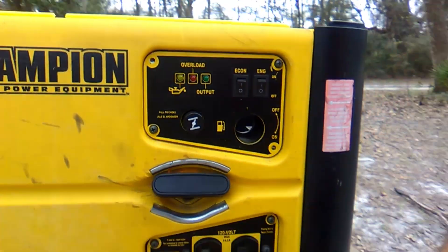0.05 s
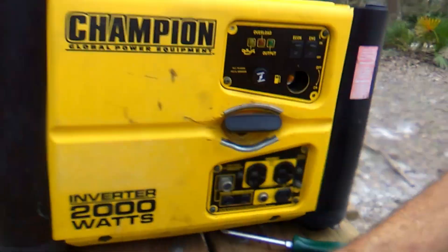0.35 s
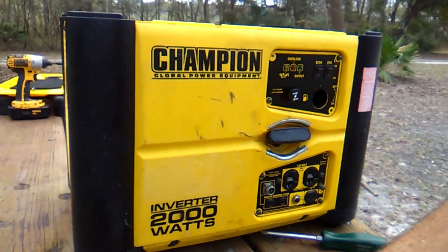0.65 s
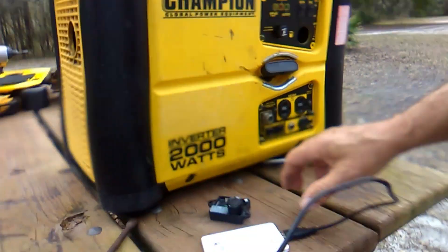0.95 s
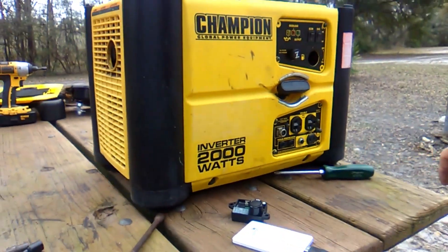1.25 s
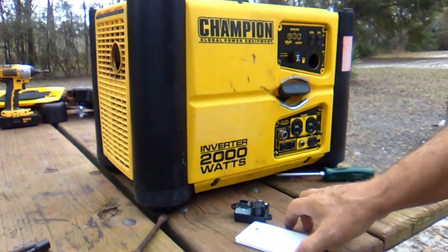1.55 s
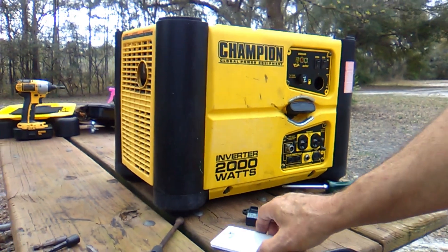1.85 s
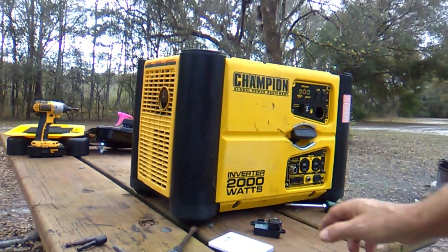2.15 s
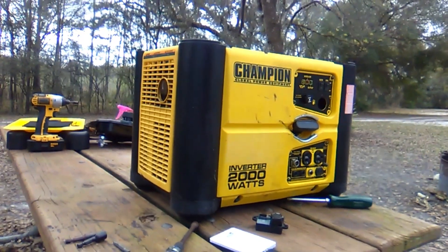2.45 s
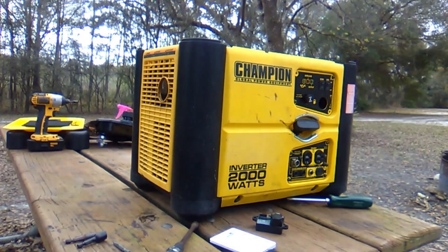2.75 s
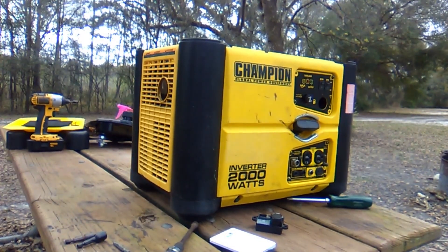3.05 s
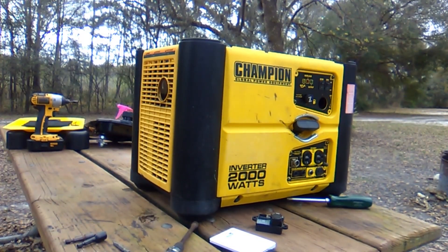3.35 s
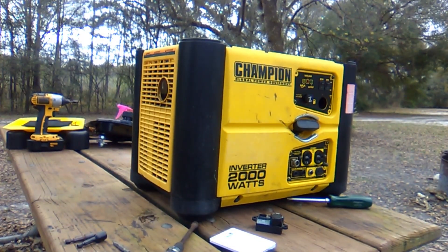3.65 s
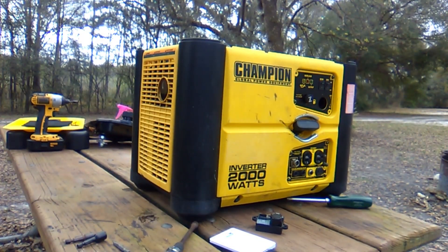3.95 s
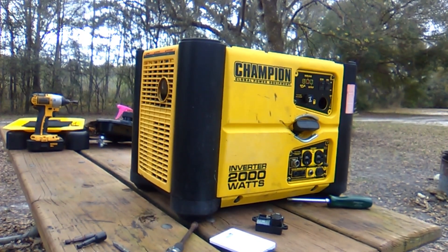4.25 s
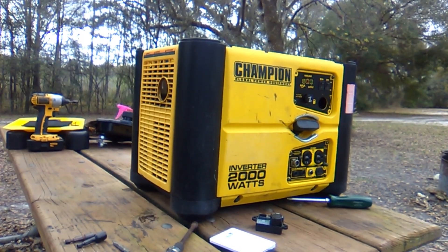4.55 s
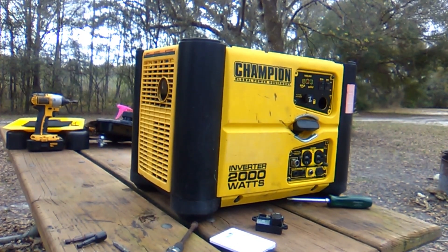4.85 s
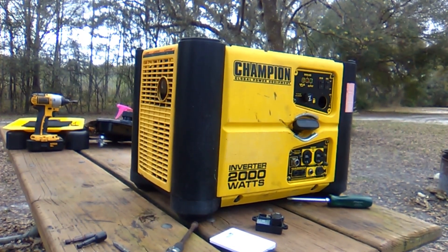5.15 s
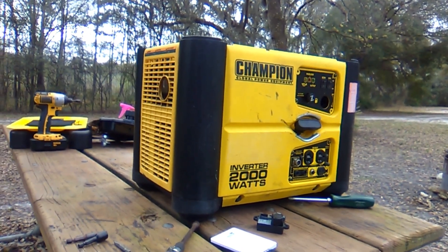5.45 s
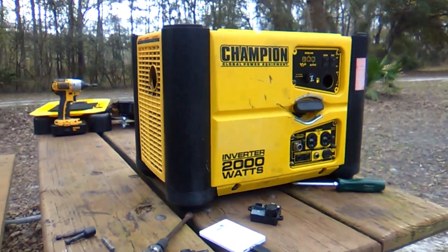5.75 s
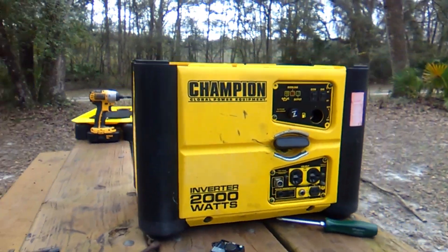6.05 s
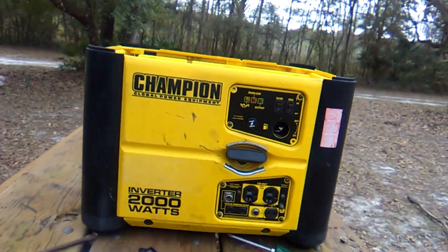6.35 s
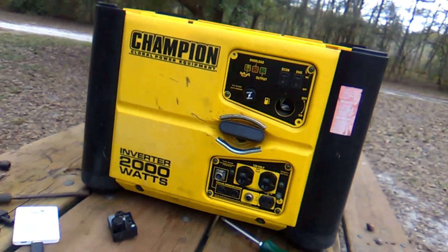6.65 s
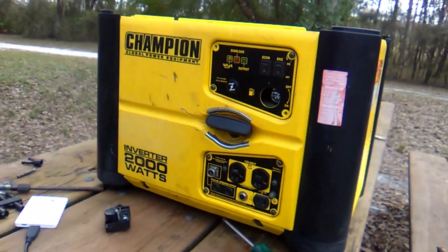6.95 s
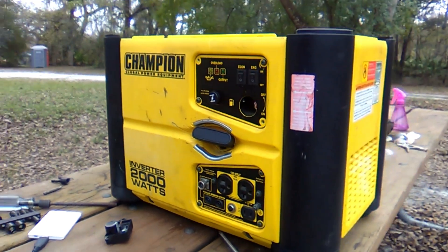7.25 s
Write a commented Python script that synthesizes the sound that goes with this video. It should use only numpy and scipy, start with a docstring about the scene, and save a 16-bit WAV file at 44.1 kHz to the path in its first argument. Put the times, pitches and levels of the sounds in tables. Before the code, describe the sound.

Fingers knock and rub on a hand-held camera, very close and mostly on the left. Dense hollow thumps, sharp plastic clicks and scrapes fill the first second or so, and a shorter burst follows. After a calmer stretch with light hissy brushes of skin, a few softer bumps return near the end. Behind it all, a small generator idles quietly outdoors with a steady low hum, fine ticking and a hiss of fan air.

```python
"""Fingers knock, judder and rub on a hand-held camera's case, next to the left microphone.
Each knock rings the case, and the hardest drive a limiter. The seams click, the grip crackles,
jolts rumble, and skin brushes over the ports, which ring near 9 kHz.
Behind this a small inverter generator idles on a picnic table outdoors as the camera moves around it:
its firings hum and puff, its valves ping their cover and its fan blows cooling air."""
import sys
import numpy as np
from scipy import signal
from scipy.fft import rfft, irfft, next_fast_len
from scipy.io import wavfile
from scipy.ndimage import uniform_filter1d, minimum_filter1d, map_coordinates

SR = 44100
rng = np.random.default_rng(int(sys.argv[2]) if len(sys.argv) > 2 else 0)


def to_wav(s):
    """Save 16-bit WAV."""
    ch = np.atleast_2d(s).T  # columns
    pcm = np.round(np.clip(ch, -1, 1) * 32767)  # PCM
    wavfile.write(sys.argv[1], SR, pcm.astype(np.int16))


N = 327222


def amp(db):
    """Decibels to gain."""
    return np.exp(np.asarray(db) * np.log(10) / 20)


def unit(x):
    """x scaled to rms 1."""
    return x / np.sqrt(np.mean(x ** 2) + 1e-20)


def peaked(x):
    """x scaled to peak 1 per channel."""
    return x / np.abs(x).max(axis=-1, keepdims=True)


def curves(rows):
    """One value per sample for each column after the time."""
    times, *columns = np.transpose(rows)
    return [np.interp(np.arange(N) / SR, times, column) for column in columns]


def wobble(per_s, hop=32):
    """Smooth random curve, per_s knots a second."""
    grid = np.arange(0, N + hop, hop)
    knots = rng.standard_normal(int(N * per_s / SR) + 4)
    return np.interp(np.arange(N), grid, map_coordinates(knots, [grid * per_s / SR]))


def coloured(x, colour):
    """Minimum-phase filter. Each row of a colour: frequency in Hz, gain in dB."""
    n = x.shape[-1]
    size = 2 * next_fast_len(n // 2 + 4096)
    hz, db = np.transpose(colour)
    gain_db = np.interp(np.log(np.fft.rfftfreq(size, 1 / SR) + 1), np.log(hz), db)
    cepstrum = irfft(np.log(amp(gain_db)))
    cepstrum[1:size // 2] *= 2
    cepstrum[size // 2 + 1:] = 0
    return irfft(rfft(x, size) * np.exp(rfft(cepstrum)), size)[..., :n]


def stereo_noise(colour, shared):
    """Coloured noise of rms 1; a share of its power is common to both microphones."""
    common = np.sqrt(shared) * rng.standard_normal(N)
    separate = np.sqrt(1 - shared) * rng.standard_normal((2, N))
    return unit(coloured(common + separate, colour))


def patchy(x, depth_db=2.4):
    """Turbulence: the level drifts in patches of pitch and time."""
    spectra = signal.stft(x, nperseg=512)[2]
    patches = uniform_filter1d(rng.standard_normal(spectra.shape[1:]), size=4, axis=0)
    patches = uniform_filter1d(patches, size=28, axis=1)
    return unit(signal.istft(spectra * amp(depth_db * unit(patches)), nperseg=512)[1][:, :N])


def panned(pan_db):
    """Left and right gains of mean 1; pan is left minus right."""
    gains = amp(np.array([pan_db, -pan_db]) / 2).reshape(2, -1)
    return gains / gains.mean(axis=0)


def add(track, start_s, sound):
    """Mix a sound in at start_s."""
    start = max(round(start_s * SR), 0)
    track[..., start:start + sound.shape[-1]] += sound[..., :N - start]


def throb(cycles, lag, sharpness, depth):
    """Gain of rms 1 that swells once per engine cycle."""
    return unit(1 + depth * np.exp(sharpness * (np.cos(2 * np.pi * (cycles - lag)) - 1)))


def stroke(start_s, length_s, attack_s=0.025, t60_s=0.18):
    """Gain that rises, holds to the end of the stroke and dies away."""
    t = np.arange(N) / SR - start_s
    return np.clip(t / attack_s, 0, 1) * amp(-60 * np.clip((t - length_s) / t60_s, 0, 2))


def bell(x, centre, width):
    """Gaussian weight: 1 at the centre, 1/e one width away."""
    return np.exp(-np.minimum(((x - centre) / width) ** 2, 20))


# Each row: time in seconds, level in dB, pan in dB.
AIR_PATH = [(0.0, -41.5, -1.5), (0.47, -41, -1), (0.52, -47.5, -2), (0.58, -42, 7), (0.72, -45.5, -10),
            (1.15, -42, -1), (1.53, -49, -7), (1.86, -50, 0), (2.07, -49, -5), (2.4, -40, -3.5),
            (2.97, -56.5, -2), (3.62, -54, -5), (3.85, -61.5, -2), (4.25, -54, -6), (4.58, -57.5, -3),
            (4.72, -53, 0), (5.23, -51.5, 3), (5.81, -47.5, -15), (6.2, -48, 2), (6.45, -42.5, 1),
            (7.05, -46, 13), (7.42, -42, 3.5)]
# Each row: frequency in Hz, gain in dB.
AIR_COLOUR = [(2000, -8), (4500, -11.5), (6500, -9.5), (7400, -2.5), (8200, 6.5), (9200, 4), (10500, -2),
              (12000, -16.5), (14000, -21)]
FIZZ_COLOUR = [(5000, -32), (8000, -35), (10000, -4), (12500, 0), (14000, -7)]

def cooling_air(cycles):
    """Fan air hisses in eddies; its finest fizz dies first as the camera turns aside."""
    air_db, pan_db = curves(AIR_PATH)
    eddies = amp(1.1 * (wobble(5.035) + np.array([wobble(16), wobble(34)])))
    air = amp(air_db + 4.5) * patchy(stereo_noise(AIR_COLOUR, shared=0.0063))
    air *= throb(cycles, lag=0.18, sharpness=6.9, depth=0.99)
    fizz_db = air_db.mean() - 10 + 1.25 * (air_db - air_db.mean())
    fizz = amp(fizz_db) * stereo_noise(FIZZ_COLOUR, shared=0.03)
    return (air + fizz) * eddies * panned(pan_db)


# Each row: frequency in Hz, level in dB, t60 in seconds.
COVER_MODES = [(1767, -1, 0.087), (1994, -4, 0.093), (2478, 7, 0.041), (2574, 11, 0.043), (2700, 12, 0.024),
               (2976, 13, 0.037), (3120, 9.5, 0.019), (3335, 11, 0.027), (3500, 2, 0.025), (3780, 5, 0.022),
               (3905, 7, 0.024), (4090, 6, 0.015), (4493, 7.5, 0.058), (4795, 7.5, 0.037)]
# Directional cover rings. Each row: time in seconds, low ring in dB, high ring in dB.
RING_PATH = [(0, -1.5, 1), (2.5, -7.5, -7), (3.3, 3.5, -2), (4.0, -20, 8), (4.6, -6, 9), (5.2, 5.5, 5),
             (5.8, 9, 5), (6.55, -4, -1), (6.85, 5.5, 0), (7.42, 6.5, 5)]
# Closings and rebounds. Each row: share of the cycle, level in dB, favoured pitch in Hz.
VALVE_STRIKES = [(0.08, 0.5, 2470), (0.18, 2, 3176), (0.84, 0.5, 4020), (0.52, -6.5, 3800)]

def valve_ticks(cycles):
    """Each valve pings its own part of the cover; the modes swell and fade as the camera moves."""
    swell_db, swell_per_s, favour_db = 2.5, 2.383, 7.5
    scatter_db, detune_share, jitter_s = 2.2, 0.005, 0.00009
    track, t = np.zeros(N), np.arange(SR // 16) / SR
    hz, db, t60_s = np.transpose(COVER_MODES)
    decays = amp(db[:, None] - 60 * t / t60_s[:, None]) * (1 - np.exp(-t / 0.0013))
    path_s, low_db, high_db = np.transpose(RING_PATH)
    knots = rng.standard_normal((len(hz), 64))
    for share, valve_db, favoured_hz in VALVE_STRIKES:
        times = np.interp(np.arange(int(cycles[-1])) + share, cycles, np.arange(N) / SR)
        drift_db = swell_db * np.array([map_coordinates(row, [times * swell_per_s]) for row in knots]).T
        drift_db += np.outer(np.interp(times, path_s, low_db), bell(hz, 2560, width=200))
        drift_db += np.outer(np.interp(times, path_s, high_db), bell(hz, 3700, width=450))
        strike_db = valve_db + favour_db * bell(hz, favoured_hz, width=250)
        for start_s, mode_db in zip(times + rng.normal(0, jitter_s, len(times)), drift_db):
            detune, strength = rng.standard_normal((2, len(hz)))
            modes = decays * np.sin(2 * np.pi * np.outer(hz * (1 + detune_share * detune), t))
            gains = amp(strike_db + mode_db + scatter_db * (strength + rng.standard_normal()))
            add(track, start_s, gains @ modes)
    return unit(track)


# Each row: time in seconds, level in dB, pan in dB.
CLATTER_PATH = [(0.0, -48, 9), (0.31, -43, 6), (1.61, -45.5, 3.5), (2.31, -43, 2.5), (2.75, -44.5, 9),
                (2.93, -57, 8), (3.29, -58.5, 12), (4.55, -50.5, 1.5), (4.69, -51, -5.5), (5.35, -60.5, -2),
                (6.16, -42.5, -2.5), (6.2, -45, 0), (6.94, -40, 7), (7.42, -46.5, 17)]
# Each row: frequency in Hz, gain in dB.
WHIRR_COLOUR = [(400, -14), (1100, 11.5), (1500, 6), (2100, 1), (2600, 3.5), (3600, 6), (4600, 1.5),
                (5200, -1), (6200, 1.5), (8500, -2.5), (14000, 0)]

def valve_clatter(cycles):
    """Valve ticks over a whirr, loudest in front of the generator's panel."""
    db, pan_db = curves(CLATTER_PATH)
    ticks = np.array([valve_ticks(cycles), valve_ticks(cycles)])
    whirr = patchy(stereo_noise(WHIRR_COLOUR, shared=0.034))
    whirr *= throb(cycles, lag=0.17, sharpness=9.4, depth=0.17)
    return amp(db - 3) * (ticks + whirr) * panned(pan_db)


# Each row: frequency in Hz, gain in dB.
DRONE_COLOUR = [(400, -9), (520, 2), (620, -1), (720, -12), (870, 7.5), (980, -7), (1110, -2.5),
                (1250, -23), (1500, -4), (1800, -20)]

def housing_drone(cycles, swell_db=3):
    """The housing drones on high multiples of the firing rate, each swelling and fading."""
    total = np.zeros(N)
    firing_hz = cycles[-1] * SR / N
    for order in range(15, 60):
        db = np.interp(order * firing_hz, *np.transpose(DRONE_COLOUR)) + swell_db * wobble(2.97)
        total += amp(db) * np.cos(2 * np.pi * (order * cycles + rng.random()) + 0.5 * wobble(14))
    return unit(total)


# Each row: multiple of the firing rate, level in dB.
EXHAUST_ORDERS = [(2, 2), (4, -2.5), (5, 0), (6, -4), (7, -1), (8, 3.5), (9, -12.5), (10, -2.5), (11, 0.5),
                  (12, -5.5), (13, -15), (14, -12), (18, -8.5), (19, -10.5)]
# Each row: time in seconds, level in dB, pan in dB.
HUM_PATH = [(0, -44, 5.5), (1.4, -45.5, 4), (2.8, -48.5, 2.5), (3.4, -46, 1.5), (4.3, -43, 1),
            (5.2, -45, 0.5), (6.1, -47, 7.5), (6.7, -50, 2.5), (7.4, -48, 4)]
# Each row: frequency in Hz, gain in dB.
PUFF_COLOUR = [(20, -31), (45, 10), (70, 10.5), (100, 7.5), (170, -5), (330, 2), (450, 3), (600, -1),
               (900, -2), (1500, -31), (3000, -15.5), (8000, -30)]

def engine_hum(cycles, waver_db=1.5, looseness_rad=1.6, low_tone_hz=41):
    """Firings feed the exhaust hum, housing drone and puffs; a faint deep tone lies beneath."""
    hum_db, pan_db = curves(HUM_PATH)
    exhaust_rad = 2 * np.pi * (cycles + 0.1443)  # orders line up loosely as the exhaust opens
    orders = np.zeros(N)
    for order, db in EXHAUST_ORDERS:
        gain = amp(db + waver_db * wobble(3.95))
        orders += gain * np.cos(order * exhaust_rad + rng.normal(0, looseness_rad) + 0.5 * wobble(11))
    hum = amp(hum_db) * (unit(orders) + amp(-16) * housing_drone(cycles)) * panned(pan_db)
    low_tone = amp(-67.5 + 2 * wobble(2.9)) * unit(np.sin(2 * np.pi * low_tone_hz * np.arange(N) / SR))
    puffs = amp(hum_db - 7.5) * stereo_noise(PUFF_COLOUR, shared=0.84)
    puffs *= throb(cycles, lag=-0.28, sharpness=1.8, depth=0.97)
    return hum + low_tone + puffs


# Each row: time in seconds, firing rate in Hz.
FIRING_RATE = [(0, 30.2), (.5, 30), (.8, 29.8), (1.3, 29.88), (2.3, 29.9), (2.9, 30.32), (3.3, 30.03),
               (4, 30.05), (4.3, 30.13), (5.2, 29.97), (6, 29.72), (6.5, 30), (6.9, 30.3), (7.42, 30.17)]

def generator():
    """A gently hunting four-stroke engine paces the hum, the clatter and the throb of the air."""
    cycles = np.cumsum(curves(FIRING_RATE)[0]) / SR
    return engine_hum(cycles) + valve_clatter(cycles) + cooling_air(cycles)


# Each row: start in seconds, length in seconds, level in dB.
GRIP_SHIFTS = [(0.19, 0.47, -44), (0.97, 0.25, -43.5), (2.37, 0.28, -48.5), (6.684, 0.41, -43.5)]
# Each row: frequency in Hz, gain in dB.
CRACKLE_COLOUR = [(800, -9), (2000, -1), (4000, -3.5), (6000, -1), (8500, 6.5), (11000, 6), (14000, -13)]

def grip_crackle(slips_per_s=110, spread_db=5.5):
    """Tiny slips of skin and plastic tick at random while the grip shifts."""
    slips = rng.random((2, N)) < slips_per_s / SR
    sizes = amp(spread_db * np.clip(rng.standard_normal((2, N)), -2, 2))
    grip = sum(amp(db) * stroke(start_s, length_s) for start_s, length_s, db in GRIP_SHIFTS)
    return grip * unit(coloured(slips * sizes, CRACKLE_COLOUR)) * panned(pan_db=5)


# Each row: centre in seconds, half length in seconds, level in dB, pan in dB, scrape re hiss in dB.
BRUSHES = [(0.274, 0.058, -36, 0, -8), (1.642, 0.012, -36.5, -16, -22), (2.013, 0.12, -33.5, -6, -22),
           (2.083, 0.014, -30.5, -14, -20), (2.111, 0.011, -24, -14, -20), (2.411, 0.035, -40, -12, -25),
           (2.959, 0.087, -35.5, -11.5, -38), (3.215, 0.024, -45.5, -6, -23), (3.515, 0.054, -36, 0.5, -26),
           (4.72, 0.07, -46.5, 2, -20), (5.004, 0.14, -46.5, -3, -4.5), (5.159, 0.041, -39.5, 0, -10.5),
           (6.395, 0.014, -29, 1, -19), (6.445, 0.038, -30, 3.5, -14), (6.699, 0.021, -36.5, 12, 1.5),
           (6.746, 0.0054, -38, 10, -1)]
# Each row: frequency in Hz, gain in dB.
PORT_COLOUR = [(700, -3.5), (2000, -7.5), (3500, -17), (5500, -8.5), (7200, 2), (8300, 12), (9500, 6.5),
               (11000, 2), (12500, -0.5), (14000, -8.5)]
SCRAPE_COLOUR = [(800, -20), (2000, -5), (2600, 4), (3400, 18), (4000, 15.5), (4700, 14.5), (5300, 11.5),
                 (9000, 6), (14000, -53)]

def port_brushes():
    """Light strokes of skin hiss in the resonance of the ports; drier ones scrape lower."""
    track, t = np.zeros((2, N)), np.arange(N) / SR
    hiss = stereo_noise(PORT_COLOUR, shared=0.065)
    scrape = stereo_noise(SCRAPE_COLOUR, shared=0.15)
    for centre_s, half_s, db, pan_db, scrape_db in BRUSHES:
        track += amp(db) * panned(pan_db) * bell(t, centre_s, half_s) * (hiss + amp(scrape_db) * scrape)
    return track * amp(1.8 * wobble(120))


# Each row: start in seconds, level in dB.
JOLTS = [(0.55, -30), (1.005, -19.5), (1.03, -29), (2.217, -32), (0.886, -43), (5.468, -35.5),
         (5.981, -34.5), (6.91, -34.5)]
# Each row: frequency in Hz, gain in dB.
JOLT_COLOUR = [(20, -17), (50, -0.5), (120, -3), (200, 1), (300, -4), (800, -45)]

def jolts():
    """A jolt of the whole camera gives a short dull rumble, stronger on the left."""
    push = sum(amp(db) * stroke(start_s, length_s=0.026, attack_s=0.01) for start_s, db in JOLTS)
    return push * stereo_noise(JOLT_COLOUR, shared=0.28) * panned(pan_db=13)


# Each row: start in seconds, level in dB, pan in dB, ring in dB, t60 in seconds, crack in dB.
CLICKS = [(0.1674, -4.5, 18, -0.5, 0.003, -11), (0.343, -4, 13, -26, 0.0036, -10),
          (0.3524, -7.5, 7, -8, 0.013, 7), (0.378, -15.5, 13, -17, 0.0045, -10),
          (0.394, -23, 10, -17, 0.0028, 0), (0.435, -26.5, 15, 5, 0.008, 2),
          (0.505, -19, -11, -30, 0.0044, -16), (0.5765, -10, 9, -18, 0.0012, -26),
          (0.592, -19, 16, -19, 0.0026, -10), (0.891, -27, -5, 3, 0.027, -6),
          (0.9224, -17, -6, -26, 0.032, -10), (0.99, 0.5, 3, -8, 0.019, -8), (1.009, -9, 4, -7, 0.0071, -4),
          (1.028, -21, 8, 9, 0.0063, -2), (1.074, -14.5, 15, 2, 0.0048, 5),
          (1.1027, -5, 10, -25, 0.0029, -8), (1.1246, -3.5, 13, -5, 0.0029, -4),
          (1.2355, -9, 9, -34, 0.0015, -26), (2.274, -20, -9, -19, 0.004, -6),
          (2.3776, -6.5, 10, -15, 0.0075, -9.5), (2.381, -19, 9, -10, 0.0052, -3),
          (2.404, -16, -4, -28, 0.007, -18), (2.443, -1, 18, -8, 0.0036, -23),
          (6.2212, -10, 11, -15.5, 0.0011, -8)]
# Each row: frequency in Hz, level in dB, t60 in seconds.
PANEL_MODES = [(1710, -0.5, 0.0079), (1870, -30, 0.0067), (2300, -13, 0.012), (4540, -7.5, 0.0011)]
# Each row: frequency in Hz, gain in dB.
SNAP_COLOUR = [(300, -17), (800, 9), (1800, 2), (3500, -4), (6500, -0.5), (8500, 17.5), (10000, 14),
               (12500, -0.5), (16000, -6)]
CRACK_COLOUR = [(600, -6), (1800, 2.5), (3000, 0), (4800, -2.5), (6000, -1), (8000, -2), (14000, -20)]

def seam_clicks():
    """The seams of the case creep, then snap or crack; the panel beside them rings briefly."""
    rise_s, tail_db, tail_t60_s, scatter_db = 0.0003, -38, 0.08, 2.5
    track, t = np.zeros((2, N)), np.arange(SR // 20) / SR
    creep_swell = amp(-44 - 60 * t[::-1] / 0.12)
    for start_s, db, pan_db, ring_db, t60_s, crack_db in CLICKS:
        decay = (1 - np.exp(-t / rise_s)) * (amp(-60 * t / t60_s) + amp(tail_db - 60 * t / tail_t60_s))
        snap = peaked(coloured(rng.standard_normal((2, len(t))) * decay, SNAP_COLOUR))
        crack = peaked(coloured(rng.standard_normal((2, len(t))) * decay, CRACK_COLOUR))
        ring = sum(amp(rng.normal(mode_db, scatter_db) - 60 * t / ring_s) * np.sin(2 * np.pi * hz * t)
                   for hz, mode_db, ring_s in PANEL_MODES)
        creep = unit(coloured(rng.standard_normal((2, len(t))), SNAP_COLOUR)) * creep_swell
        gain = amp(db + 3) * panned(pan_db)
        add(track, start_s - len(t) / SR, gain * creep)
        add(track, start_s, gain * (snap + amp(crack_db) * crack + amp(ring_db) * ring))
    return track


# Each row: start in seconds, length in seconds, level in dB, firmness from 0 to 1.
RUBS = [(-0.02, 0.021, -32.5, 1), (0.109, 0.081, -35.5, 0.57), (0.159, 0.29, -30, 0.83),
        (0.343, 0.094, -23, 1), (0.574, 0.1, -28.5, 0.83), (0.696, 0.13, -30, 0.99),
        (0.962, 0.079, -17.5, 0.93), (1.07, 0.033, -20.5, 0.95), (1.152, 0.087, -32, 0.75),
        (2.041, 0.097, -37, 0.58), (2.211, 0.036, -27, 0.47), (2.309, 0.16, -34.5, 0.45),
        (2.89, 0.066, -35.5, 0.55), (4.073, 0.14, -48, 0), (4.377, 0.091, -49.5, 0.23),
        (5.121, 0.049, -34, 0), (5.247, 0.39, -43.5, 0.23), (5.43, 0.31, -39, 0.97),
        (6.176, 0.013, -29, 0.4), (6.903, 0.075, -26, 0.9), (7.118, 0.03, -37.5, 0.98)]
# Each row: frequency in Hz, gain in dB.
FIRM_GRIP_COLOUR = [(20, -46), (60, -24), (230, -22), (295, 0.5), (340, 7), (390, -1), (470, -6.5),
                    (620, -15), (760, -20), (900, -35), (1400, -25), (3000, -36), (8000, -70)]
LIGHT_GRIP_COLOUR = [(20, -45), (60, -23), (230, -1), (340, 0), (450, 7.5), (580, 10), (720, 8), (850, -2),
                     (1100, -2.5), (1400, -19), (3000, -60), (8000, -59)]

def finger_rubs(grain_db=3):
    """Skin sticks and slips, rasping and ringing the case: low under a firm grip, higher if light."""
    slips = rng.standard_normal((3, 2, N)) * amp(grain_db * wobble(110))
    colours = FIRM_GRIP_COLOUR, LIGHT_GRIP_COLOUR, SCRAPE_COLOUR
    firm, light, rasp = (unit(coloured(x, colour)) for x, colour in zip(slips, colours))
    power = np.array([amp(db) * stroke(start_s, length_s) for start_s, length_s, db, _ in RUBS]) ** 2
    firmness = np.array(RUBS)[:, -1]
    ring = np.sqrt(firmness @ power) * firm + np.sqrt((1 - firmness) @ power) * light
    return amp(6) * (ring + amp(-0.5) * power.sum(axis=0) * rasp)


# Each row: frequency in Hz, gain in dB.
SCUFF_COLOUR = [(25, -52), (60, -2.5), (150, -10), (240, -6.5), (330, 6.5), (430, -1), (540, 6.5), (720, 5),
                (830, -6.5), (1100, -6.5), (1300, -26), (1600, -25.5), (2500, -39), (5000, -82),
                (14000, -81)]
CLACK_COLOUR = [(300, -26), (700, 1), (1050, 5), (1550, 0.5), (2400, -10), (3800, -21.5), (5500, -29.5),
                (14000, -39)]

def thump(hz, t60_s, scuff_db, clack_db, clack_t60_s=0.031):
    """A fingertip hits the case: a ring and a skin scuff, both damped by it, and a plastic clack."""
    t = np.arange(SR // 8) / SR
    decay = (1 - np.exp(-t / 0.001)) * amp(-60 * t / t60_s)
    clack_decay = (1 - np.exp(-t / 0.00038)) * amp(-60 * t / clack_t60_s)
    ring = decay * np.sin(2 * np.pi * hz * t)
    scuff = coloured(rng.standard_normal((2, len(t))) * decay, SCUFF_COLOUR)
    clack = coloured(rng.standard_normal((2, len(t))) * clack_decay, CLACK_COLOUR)
    return peaked(ring) + amp(scuff_db) * peaked(scuff) + amp(clack_db) * peaked(clack)


# Each row: start in seconds, level in dB, ring in Hz, t60 in seconds, scuff in dB, clack in dB,
# judder length in seconds.
KNOCKS = [(0.340, 1.5, 351, 0.034, -7, -20, 0), (0.348, 4, 536, 0.053, 0, -7, 0),
          (0.353, -2, 405, 0.023, 6, -4, 0.0037), (0.3786, -3, 540, 0.018, -3, -12, 0),
          (0.387, -5, 424, 0.044, -2, -12, 0.00046), (0.395, 2, 324, 0.067, -7, -16, 0.0027),
          (0.4137, -0.5, 516, 0.026, 0, -15, 0.00081), (0.429, 3.5, 559, 0.033, -1.5, -6.5, 0.00006),
          (0.5447, -3.5, 350, 0.047, -10, -15, 0.0022), (0.553, -6.5, 470, 0.032, 4.5, -6, 0.0047),
          (0.561, -2, 516, 0.031, 1, -14, 0.00098), (0.572, -6.5, 414, 0.032, -5, -11, 0.0038),
          (0.588, -2.5, 346, 0.039, -10, -21, 0.0021), (0.598, -1.5, 362, 0.055, -7, -11, 0),
          (0.610, -2, 346, 0.047, -15, -19, 0.0067), (0.632, -14, 510, 0.042, 4, -15, 0.0019),
          (0.648, -17, 598, 0.015, 3, -16, 0), (0.671, -20.5, 680, 0.012, 7, -18, 0.00063),
          (0.682, -17, 650, .015, -2, -14, 0.0042), (0.715, -12, 418, 0.026, -3, -19, 0.0026),
          (0.892, -21.5, 679, 0.021, -1, -7, 0.024), (0.971, -15.5, 650, 0.033, 12.5, -10, 0.00075),
          (0.978, -2, 336, 0.058, -1, -3, 0.00046), (0.986, -1.5, 714, 0.019, 6, 6, 0.00027),
          (0.993, 3, 326, 0.039, 1, 2, 0.00064), (1.004, 3.5, 370.7, 0.033, -4, -8, 0.004),
          (1.022, -4, 343, 0.021, -10, -21, 0), (1.028, 4, 378, 0.038, 5, 1, 0),
          (1.041, 2.5, 338, .022, 1.5, -7.5, 0.0033), (1.065, -5.5, 569, 0.02, 3, 2, 0.0027),
          (1.074, 0, 723, 0.024, -6, 2, 0.00028), (1.084, -5, 322, 0.041, -10, -22, 0.0021),
          (1.093, -8.5, 365, 0.025, -8, -10, 0.0021), (1.109, 1.5, 418, 0.038, -5, -23, 0.00011),
          (1.119, 0.5, 505, 0.026, -0.5, -4.5, 0.002), (1.146, -6.5, 503, 0.029, -0.5, -15, 0.0013),
          (1.156, -13, 612, 0.037, -17, -15, 0.011), (1.176, -8.5, 369.5, 0.032, -13, -23, 0.0021),
          (1.223, -17.5, 328, 0.058, -11, -26, 0.0053), (1.594, -28, 710, 0.041, -6, -8, 0.0057),
          (2.2012, -8.5, 535, 0.02, -1, -12, 0), (2.2124, -8, 440.4, 0.021, -4, -15, 0.0016),
          (2.2206, -8, 480, 0.024, 0.5, -3, 0.0029), (2.238, -11, 460, 0.015, -0.5, -21, 0.011),
          (2.305, -17, 700, 0.014, -2, -19, 0.00051), (2.3191, -11.5, 558, 0.033, 0, -26, 0.00059),
          (2.360, -3, 424, 0.041, -5.5, -29, 0), (2.399, -12.5, 563, 0.025, -7, -20, 0),
          (2.4355, -2.5, 486.7, 0.023, -8.5, -9, 0.0043), (2.463, -13, 520, 0.03, -6, -14, 0.012),
          (2.552, -26, 632.5, 0.028, 1.5, -18, 0.0061), (2.864, -30.5, 612, 0.024, 5, -20, 0.0061),
          (4.157, -33, 640, 0.023, -2, -20, 0.0018), (5.111, -23.5, 600, 0.046, -14, -10, 0.019),
          (5.216, -27, 720, 0.035, -15, -26, 0.0074), (5.339, -23.5, 537, 0.016, 3.5, -27, 0.0033),
          (5.386, -24.5, 727, 0.045, -12, -21, 0), (5.441, -27.5, 445, 0.021, 7.5, -22, 0.0023),
          (5.495, -8, 429.5, 0.022, 2, -16, 0.0014), (5.509, -17.5, 353, 0.071, -13, -20, 0.0098),
          (5.559, -8, 342, 0.075, -7.5, -40, 0.0016), (5.617, -25, 415, 0.028, 6, -24, 0),
          (5.884, -21, 517, 0.018, -0.5, -26, 0.028), (5.987, -5.5, 540, 0.034, -3, -8.5, 0),
          (6.477, -32, 440, 0.033, 3, 2, 0), (6.537, -31, 566, 0.017, 5.5, -19, 0),
          (6.881, -27.5, 605, 0.024, -1, -18, 0.0092), (6.905, -9.5, 367, 0.063, -4.5, -9, 0.0029),
          (6.9379, -9, 474, 0.024, -5, -13, 0.0011), (6.95, -11.5, 382, 0.039, -4.5, -27, 0.0019),
          (7.016, -28.5, 702, 0.018, 1, -2, 0.0055), (7.111, -7.5, 650, 0.0076, -4, -14, 0.034)]
# The stiff case yields little at low pitch. Each row: frequency in Hz, gain in dB.
CASE_RESPONSE = [(20, -30), (45, 0.5), (100, -8), (190, -1.5), (290, 2), (1000, 2.5), (1500, 2)]

def finger_knocks():
    """Each finger lands with a thump; a juddering one slips up to three times, ever weaker."""
    slip_s, loss_db, jitter_share, detune_share = 0.0073, 2, 0.066, 0.037
    track = np.zeros((2, N))
    for start_s, db, hz, t60_s, scuff_db, clack_db, judder_s in KNOCKS:
        add(track, start_s, amp(db) * thump(hz, t60_s, scuff_db, clack_db))
        if judder_s < slip_s / 2:
            continue
        for k, (jitter, _, detune) in enumerate(rng.standard_normal((3, 3)), 1):
            gain = np.clip(judder_s / slip_s - k + 1, 0, 1) * amp(db - loss_db * k)
            slip = thump(hz * np.exp(detune_share * detune), t60_s, scuff_db, clack_db)
            add(track, start_s + slip_s * (k + jitter_share * jitter), gain * slip)
    return coloured(track, CASE_RESPONSE)


# Path through the case to the right microphone. Each row: frequency in Hz, gain in dB.
ACROSS_CASE = [(50, -3.5), (170, -6), (330, -22.5), (550, -25.5), (900, -17.5), (2000, -9.5), (6000, 3)]

def scene():
    """Fingers work at the left microphone, over the generator; little of their ring crosses the case."""
    background = generator()
    left, right = finger_knocks() + finger_rubs()
    fingers = np.array([left, coloured(right, ACROSS_CASE)])
    return background + fingers + jolts() + seam_clicks() + grip_crackle() + port_brushes()


def record(dry, ceiling=0.96, window_s=0.002, top_hz=14400):
    """A fast limiter per channel, then a steep low-pass."""
    window = round(window_s * SR)
    needed_gain = ceiling / np.maximum(np.abs(dry), ceiling)
    limited = dry * uniform_filter1d(minimum_filter1d(needed_gain, window), window // 2)
    size = next_fast_len(N + SR // 2)
    low_pass = 1 / (1 + (np.fft.rfftfreq(size, 1 / SR) / top_hz) ** 80)
    return irfft(rfft(limited, size) * low_pass, size)[:, :N]


dry = scene()
out = record(dry)
to_wav(out)
```